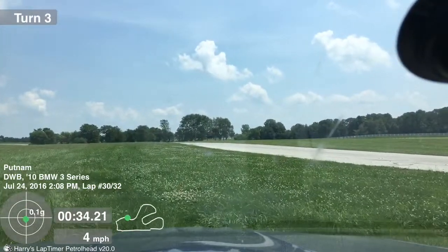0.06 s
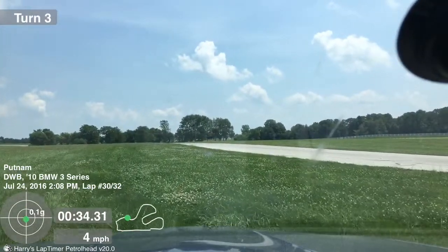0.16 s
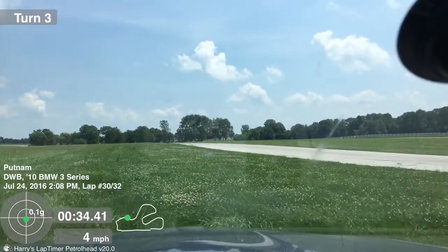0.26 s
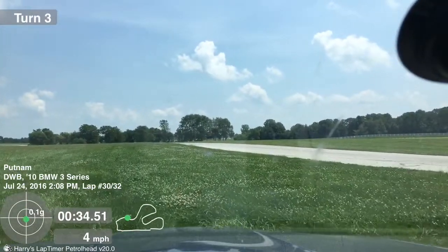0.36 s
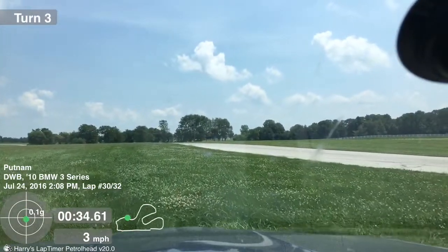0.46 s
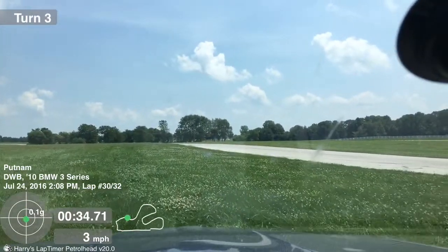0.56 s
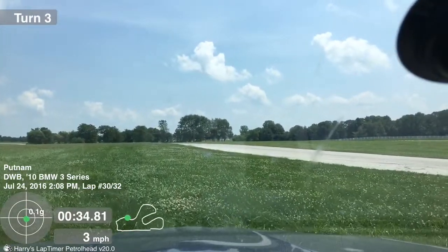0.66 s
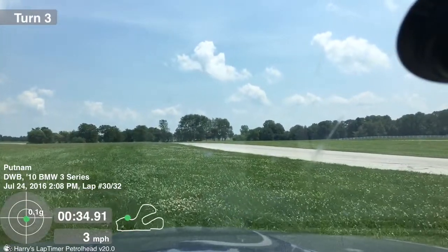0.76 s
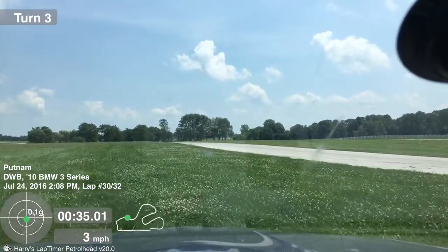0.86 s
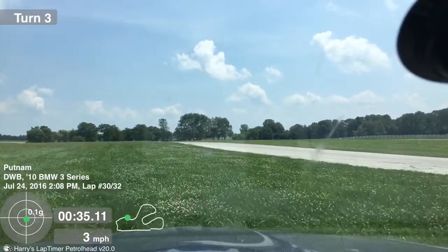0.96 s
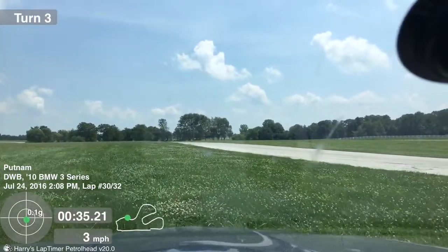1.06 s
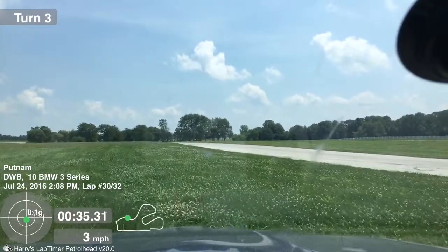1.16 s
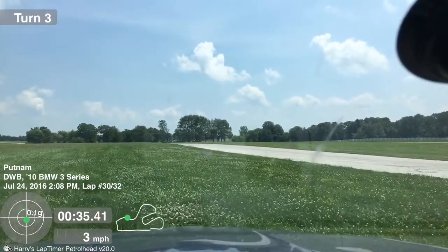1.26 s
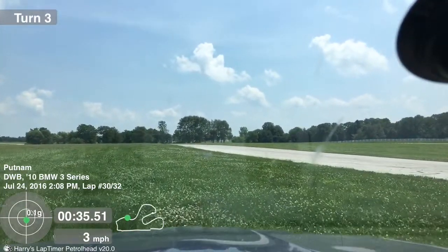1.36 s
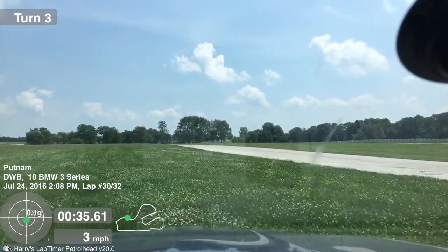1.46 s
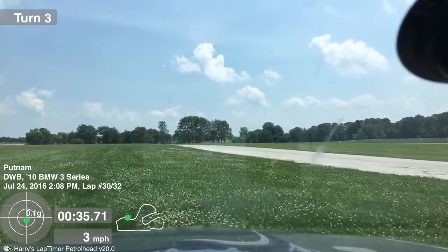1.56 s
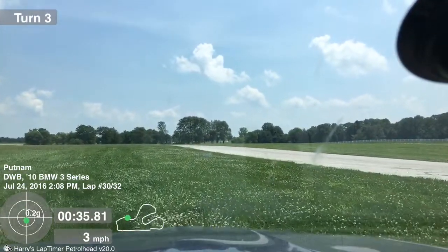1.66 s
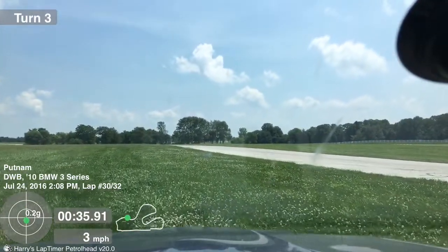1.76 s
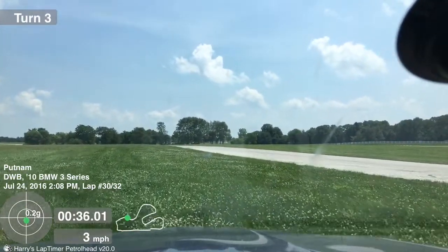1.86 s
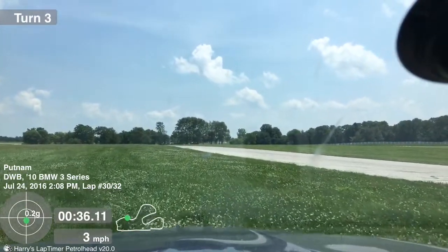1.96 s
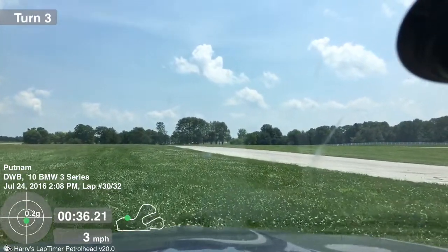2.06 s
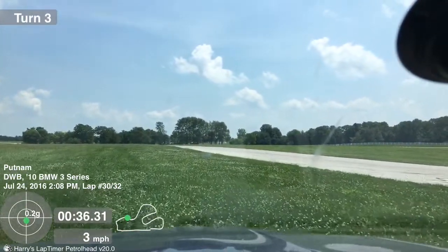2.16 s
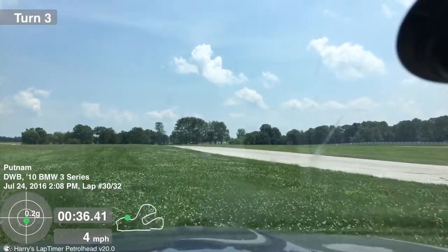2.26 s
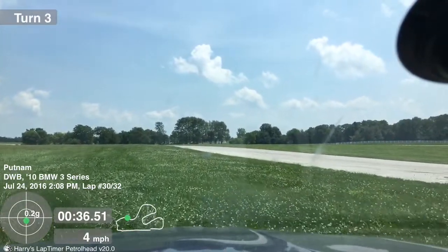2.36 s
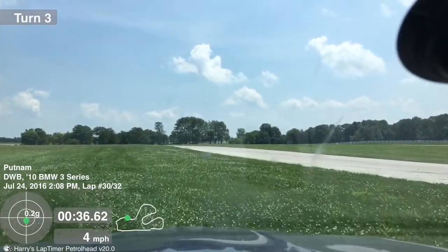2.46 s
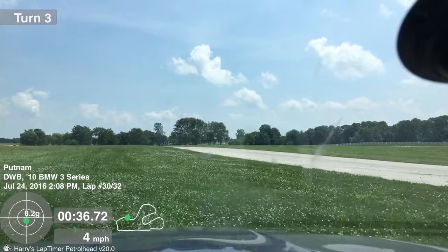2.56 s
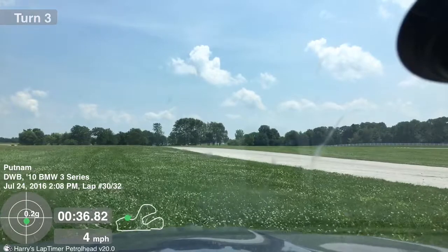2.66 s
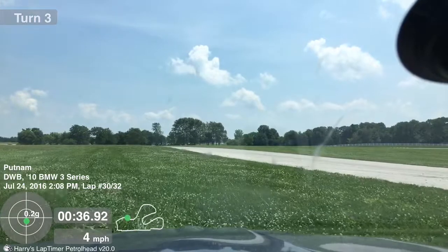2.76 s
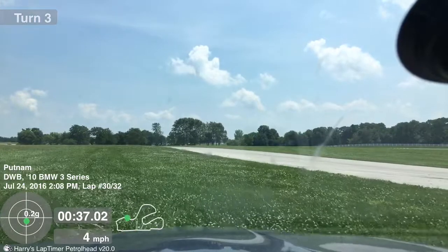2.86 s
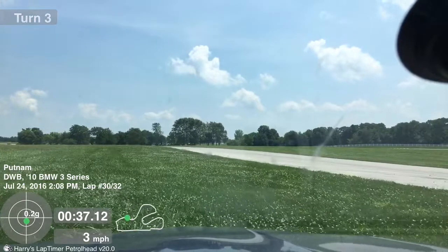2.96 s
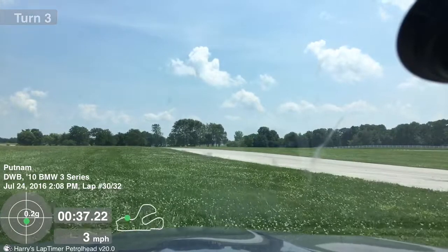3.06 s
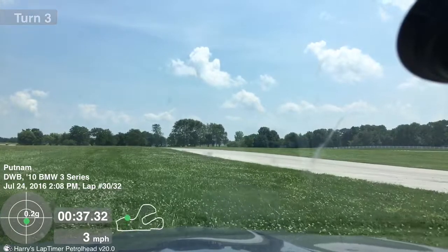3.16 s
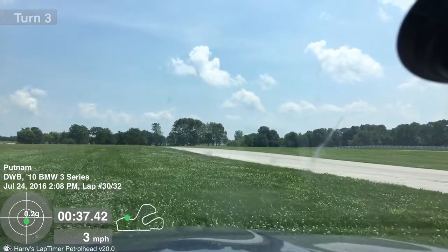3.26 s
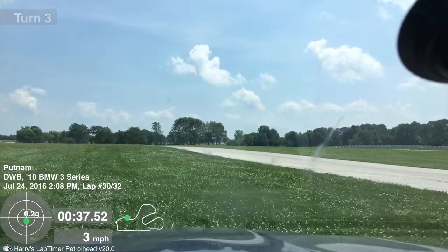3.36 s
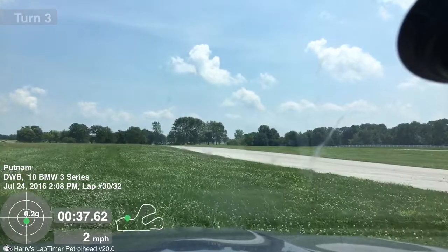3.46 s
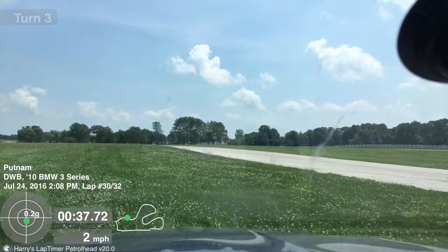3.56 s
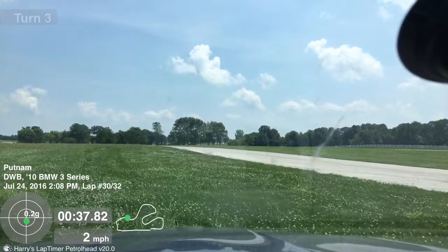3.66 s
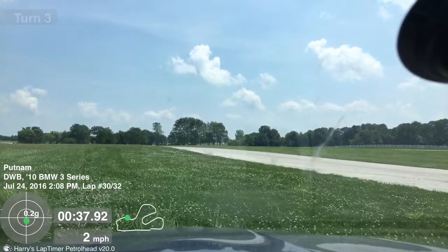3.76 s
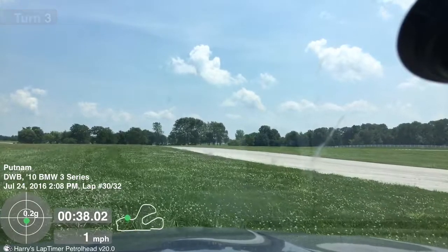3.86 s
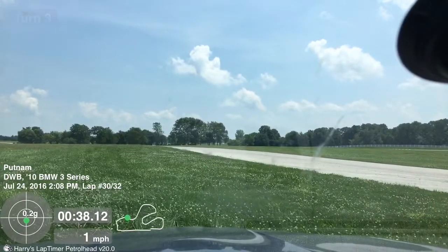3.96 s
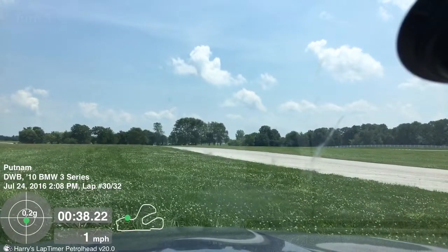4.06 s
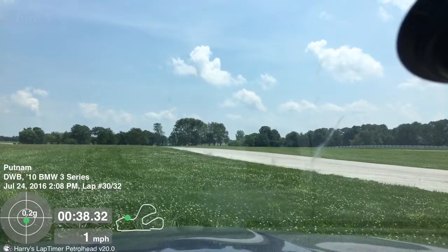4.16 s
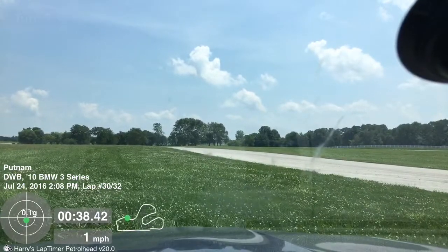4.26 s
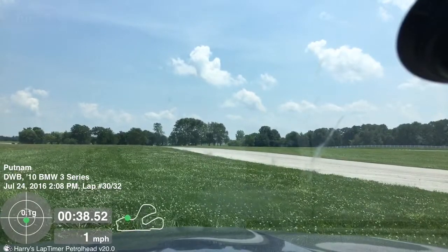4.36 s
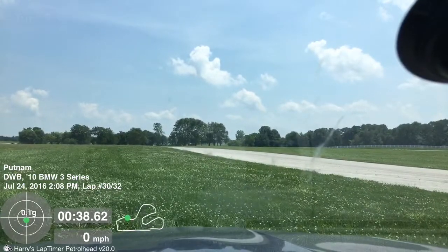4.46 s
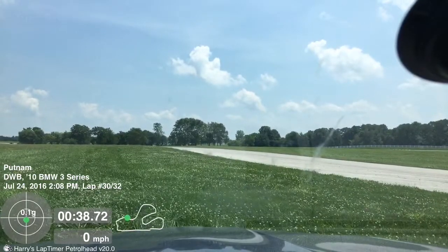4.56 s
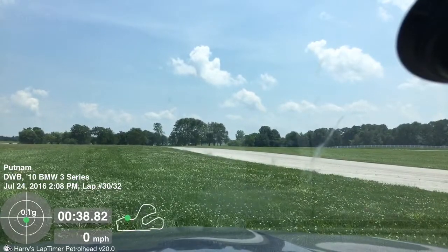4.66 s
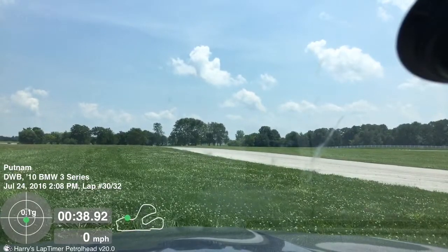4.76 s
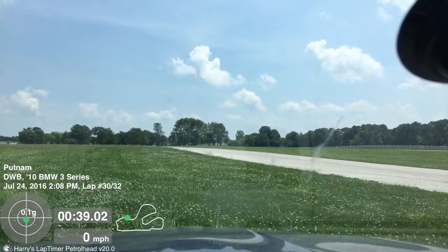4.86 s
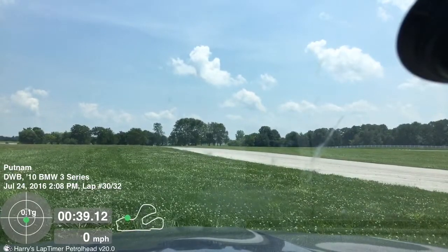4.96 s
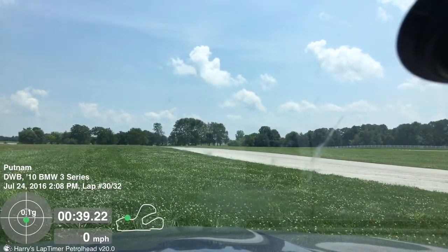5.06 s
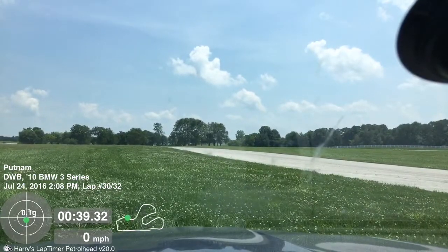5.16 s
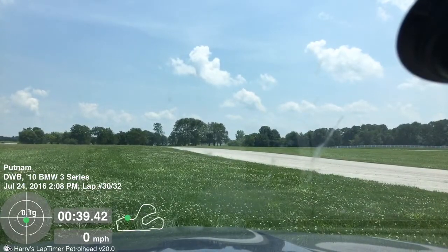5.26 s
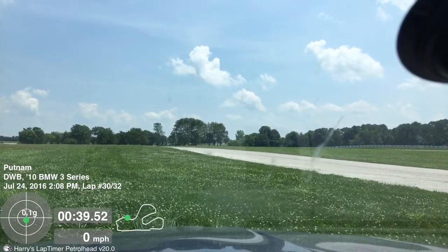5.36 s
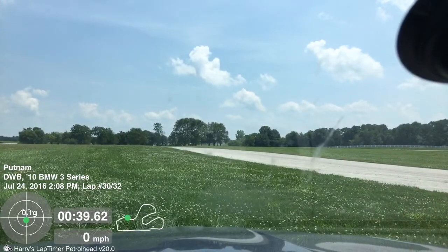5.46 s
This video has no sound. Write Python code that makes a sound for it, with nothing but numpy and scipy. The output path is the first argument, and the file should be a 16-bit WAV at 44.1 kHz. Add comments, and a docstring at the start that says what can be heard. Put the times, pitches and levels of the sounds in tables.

```python
"""A low rumble of tyres on grass and the ventilation's roar come first, inside a creeping six-cylinder car.
The engine, a sum of tones tied to its firing, lifts from idle, booms under load, sags and settles to idle.
The body thumps on bumps, as short swells of low tone; the drive whirrs, as noise with whining partials.
Hands and sleeves rustle and click at the controls, as shaped noise bursts; a plastic catch snaps.
The gear lever knocks once and rebounds, as decaying modes driven by contact pulses."""
import sys
import numpy as np
from scipy import signal
from scipy.fft import rfft, irfft
from scipy.io import wavfile

SR = 44100
rng = np.random.default_rng(int(sys.argv[2]) if len(sys.argv) > 2 else 0)


def log_audio(samples):
    """Write samples as a 16-bit WAV file to the path given in sys.argv[1]."""
    # one column per channel
    frames = np.atleast_2d(samples).T
    # limit to full scale, then quantise
    limited = np.clip(frames, -1, 1)
    pcm = np.round(limited * 32767).astype(np.int16)
    wavfile.write(sys.argv[1], SR, pcm)


N = 242991
T = np.arange(N) / SR  # time in seconds

# Bumps through the suspension.
# Each row: peak time in seconds, level in dB, frequency in Hz, half length in seconds.
BUMPS = [(.075, -27, 150, 0.007), (.2, -32.5, 78.6, 0.07), (0.379, -21, 77.6, 0.042),
         (0.519, -18.5, 91, 0.01), (1.041, -21, 74.6, 0.015), (1.124, -16.5, 144.5, 0.0097),
         (3.085, -23, 136, 0.013), (3.299, -18.5, 76.5, 0.0078), (3.9, -28, 105, 0.014),
         (4.98, -28.5, 173.8, 0.01315)]


def amp(db):
    """Level and amplitude: 20 dB is a factor of ten."""
    return 10 ** (np.asarray(db) / 20)


def unit(x):
    """Normalization by the root mean square, to rms 1."""
    return x / np.sqrt(np.mean(x ** 2) + 1e-20)


def curves(rows):
    """Linear interpolation in time of each column after the first."""
    s, *columns = np.transpose(rows)
    return [np.interp(T, s, column) for column in columns]


def colour(x, points):
    """Zero-phase filtering: the spectrum is multiplied by a gain joined in dB over log frequency."""
    hz, db = np.transpose(points)
    f = np.fft.rfftfreq(len(x), 1 / SR)
    gain = amp(np.interp(np.log(f + 1), np.log(hz), db))
    return irfft(rfft(x) * gain, len(x))


def noise(points):
    """Broadband noise: white noise filtered to a given spectrum, at rms 1."""
    return unit(colour(rng.standard_normal(N), points))


def drift(rate_hz):
    """Slow random fluctuation: white noise low-passed around rate_hz, at rms 1."""
    f = np.fft.rfftfreq(N, 1 / SR)
    return unit(irfft(rfft(rng.standard_normal(N)) / (1 + (f / rate_hz) ** 4), N))


def swell(s, half_s):
    """Gaussian envelope around time s, down to 1/e at half_s to either side."""
    return np.exp(-((T - s) / half_s) ** 2)


def add(mix, s, sound):
    """Superposition: adds a sound into the mix from time s."""
    part = mix[max(round(s * SR), 0):][:len(sound)]
    part += sound[:len(part)]


def ring(modes):
    """Free decay as a sum of damped modes; alternate signs set neighbours swinging against each other."""
    t = T[:SR // 4]
    out = np.zeros(len(t))
    for k, (hz, db, t60) in enumerate(modes):
        out += (-1) ** k * amp(db - 60 * t / t60) * np.sin(2 * np.pi * hz * t)
    return out


def cabin_echo(x, wet_db, t60):
    """Reverberation: dense, decaying reflections from glass and trim, by convolution."""
    t = T[:SR // 6]
    taps = rng.standard_normal(len(t)) * amp(-60 * t / t60) * (t > .002)
    return x + amp(wet_db) * signal.fftconvolve(x, taps / np.linalg.norm(taps))[:N]


def tyre_rumble():
    """Structure-borne noise: tyres rumble through the floor, fading slowly and shaken up at each bump."""
    # Each row: frequency in Hz, relative level in dB.
    rumble_colour = [(15, -22), (25, -18), (36, 4), (60, 1), (75, 7), (90, 1.5), (145, 2), (175, -18.5),
                     (215, -14), (400, -45), (900, -96)]
    roll_db, fade_db_per_s = -36, 0.5
    shake_db, shake_s = -18, .1  # level against the bump, half length
    shake = sum(amp(db + shake_db) * swell(s, shake_s) for s, db, _, _ in BUMPS)
    rolling = amp(roll_db - fade_db_per_s * T)
    return np.hypot(rolling, shake) * noise(rumble_colour)


def blower():
    """Flow noise and tonal hum: the blower roars broadly, and its steady tones waver with the air flow."""
    # Each row: frequency in Hz, relative level in dB.
    roar_colour = [(60, -18.5), (170, 6), (260, -1), (340, -2), (410, -5.5), (480, -7.5), (660, -10.5),
                   (820, -21.5), (1100, -17.5), (2000, -34), (5000, -45)]
    # Hum of the blower. Each row: frequency in Hz, mean peak level in dB.
    hum_tones = [(401, -55.5), (251.5, -56.5), (772, -75.5)]
    roar_db = -45.5
    out = amp(roar_db + 1.53 * drift(14)) * noise(roar_colour)
    for hz, db in hum_tones:
        phase = 2 * np.pi * hz * T + 1.2 * drift(6)
        out += amp(db + 2.5 * drift(4)) * np.cos(phase)
    return out


def whirr(turns, throb=0.059, trim_db=0.5, whine_rise=1.7):
    """Amplitude modulation: valve gear hisses in step with the firing, over the whine of belt-driven parts."""
    # Each row: frequency in Hz, relative level in dB.
    hiss_colour = [(300, -36.5), (800, -2), (1050, -5), (1270, 3), (1420, -0.5), (1620, -1), (2000, -8),
                   (2500, -13), (3100, -17), (4100, -14), (4900, -21), (6400, -21), (8000, -32),
                   (15000, -44)]
    # Level of belt and valve gear. Each row: time in seconds, level in dB before the trim.
    whirr_levels = [(0, -57.5), (2.8, -60), (3.3, -57), (4.4, -59), (5.2, -53.5), (5.51, -55.5)]
    # Each row: multiple of the firing rate, level in dB against the whirr where that is loudest.
    whine_partials = [(24, -21), (36, -16.5), (40, -12.5), (44, -16.5), (46, -14), (48, -17.5)]
    level_db, = curves(whirr_levels)
    hiss = noise(hiss_colour) * (1 + throb * np.cos(2 * np.pi * turns))
    hiss = hiss * amp(.8 * drift(16))
    whine = np.zeros(N)
    for multiple, db in whine_partials:
        # each partial swells and wavers by itself
        phase = 2 * np.pi * multiple * turns + drift(9)
        whine += amp(db + 3 * drift(4)) * np.cos(phase)
    # the whine grows faster than the hiss as the level rises
    whine_gain = amp(whine_rise * (level_db - level_db.max()))
    return amp(level_db + trim_db) * (hiss + whine * whine_gain)


def drone():
    """A linear frequency glide: a low tone swells, rises a little and fades as the engine recovers."""
    # Values: peak time in seconds, level in dB, frequency at the peak in Hz,
    # half length in seconds, glide in Hz per second.
    s, db, hz, half_s, glide = (4.04, -46.5, 268, .16, 35)
    t = T - s
    return amp(db) * swell(s, half_s) * np.cos(2 * np.pi * (hz + glide * t / 2) * t)


def rustle(rest_db=-76, crackle_db=-1, trim_db=0.5):
    """Stick-slip friction: cloth and skin slide in clumps of tiny slips; now and then a crease snaps."""
    # Strokes of sleeves and hands.
    # Each row: peak time in seconds, level in dB before the trim, half length in seconds.
    hand_strokes = [(0.29, -61, 0.05), (0.553, -47, 0.037), (0.584, -45, 0.0071), (0.683, -57.5, 0.019),
                    (1.288, -59.5, .035), (1.382, -57, 0.028), (2.26, -55.5, 0.032), (2.337, -61.5, 0.2),
                    (2.783, -66.5, 0.062), (2.99, -62.5, 0.078), (3.109, -55.5, 0.031), (3.31, -67, .11),
                    (3.592, -60.5, 0.031), (5.1, -60.5, 0.091), (5.27, -62, 0.097)]
    # Each row: frequency in Hz, relative level in dB.
    friction_colour = [(500, -33), (1500, 6), (2800, 1), (4000, 5.5), (7000, 1.5), (9000, 0.5),
                       (11000, -5.5), (13000, -3), (15500, -10.5)]
    power = amp(rest_db) ** 2
    for s, db, half_s in hand_strokes:
        power = power + (amp(db + trim_db) * swell(s, half_s)) ** 2
    slips = rng.standard_normal(N) * amp(2.5 * drift(900) + 2.2 * drift(60))
    # about 60 creases per second, each a burst of noise decaying in 1.8 ms
    creases = rng.uniform(.3, 1, N) * (rng.random(N) < 60 / SR)
    creases = signal.oaconvolve(creases, np.exp(-T[:512] / .0018))[:N]
    creases = creases * rng.standard_normal(N)
    friction = unit(slips) + amp(crackle_db) * unit(creases)
    return np.sqrt(power) * unit(colour(friction, friction_colour))


def clicks(fall_s=0.0014, focus_db=7.5, trim_db=-4.5):
    """Impact noise: each tap is a short burst, favoured around the pitch of the part that is tapped."""
    # Taps at the controls.
    # Each row: time in seconds, level in dB before the trim, pitch of the tapped part in Hz.
    control_taps = [(0.159, -45, 4060), (0.297, -40, 6750), (0.3282, -39.5, 4270), (0.4957, -42, 4000),
                    (0.54, -38, 7180), (0.5727, -23.5, 3830), (0.6735, -33, 3970), (1.1324, -39, 4250),
                    (1.3743, -34.5, 4946), (1.3844, -39.5, 3630), (1.7526, -45, 3457), (1.8353, -49, 3030),
                    (2.172, -44, 3660), (2.2132, -33, 3796), (2.2397, -38, 4146), (2.2533, -37, 5280),
                    (2.2886, -34.5, 3600), (2.5298, -45, 3278), (2.5715, -46, 4430), (2.9711, -29.5, 5325),
                    (3.0219, -44, 5300), (3.0939, -39.5, 7200), (3.2001, -43, 3877), (3.274, -45.5, 4420),
                    (3.4006, -39, 3100), (3.5576, -37, 9660), (4.2106, -40, 3360), (5.227, -40.5, 5740),
                    (5.3153, -43, 5783), (5.3863, -40, 5267)]
    # Each row: frequency in Hz, relative level in dB.
    tap_colour = [(300, -30), (1000, -1), (2400, -2.5), (3700, -5.5), (5200, -3), (7200, -1), (9500, -6),
                  (13000, -8), (16000, -16)]
    out = np.zeros(N)
    t = T[:2048] - .002
    tap = np.exp(-abs(t) / fall_s) * (1 - np.exp(-np.maximum(t, 0) / .0003))
    # the dashboard scatters a short tail after the tap
    scatter = amp(-12 - 60 * t / .07) * (t > 0)
    for s, db, hz in control_taps:
        burst = rng.standard_normal(len(t)) * (tap + scatter)
        burst = colour(burst, tap_colour)
        burst = colour(burst, [(hz / 2, -focus_db), (hz, 0), (hz * 2, -focus_db)])
        # equal energy for every burst before its level
        burst = burst * np.sqrt(SR * fall_s) / np.linalg.norm(burst)
        add(out, s + t[0], amp(db + trim_db) * burst)
    return out


def snaps(trim_db=-10):
    """Modal decay: a plastic catch rings briefly and the cabin reflects it."""
    # Each row: time in seconds, level in dB before the trim.
    catch_snaps = [(0.55, -35.5), (0.572, -38.5), (4.213, -34)]
    # Each row: mode frequency in Hz, relative level in dB, 60 dB decay time in seconds.
    catch_modes = [(1150, 2, 0.023), (1397, 1, 0.034), (1623, -1, 0.066), (1806, -1.5, 0.034),
                   (2150, -5, .015), (2590, -7, 0.028), (3250, 4, 0.0063)]
    out = np.zeros(N)
    for s, db in catch_snaps:
        add(out, s, amp(db + trim_db) * ring(catch_modes))
    return cabin_echo(out, wet_db=-2.0, t60=0.033)


def knocks():
    """Contact time as a low-pass: the lever hits its stop and rebounds; long contacts ring only low modes."""
    # Blows of the gear lever.
    # Each row: time in seconds, level in dB, contact time in milliseconds.
    lever_blows = [(3.0708, -27.5, .38), (3.093, -43, 2.0), (3.1045, -30.5, .85), (3.127, -39, 1.2),
                   (3.1708, -32, .8)]
    # Modes of lever and console.
    # Each row: frequency in Hz, relative level in dB, 60 dB decay time in seconds.
    lever_modes = [(271, 1, 0.078), (297, 0, 0.082), (367, -1, 0.044), (450, -1.5, 0.036), (680, -5, 0.052),
                   (739, -4, 0.049), (1180, -3, 0.025), (1260, -5, 0.026), (1480, -10.5, 0.037),
                   (1760, -19, .035), (1840, -20, .03), (2380, -15.5, 0.027), (3230, -18, 0.022)]
    out = np.zeros(N)
    ms = 1000 * T[:256]
    for s, db, contact_ms in lever_blows:
        push = np.sin(np.pi * np.minimum(ms / contact_ms, 1)) ** 2
        add(out, s, amp(db) * np.convolve(ring(lever_modes), push / push.sum()))
    return cabin_echo(out, wet_db=-12, t60=.1)


def thumps():
    """Cavity resonance: bumps swell and die in the cabin's low air modes."""
    out = np.zeros(N)
    for s, db, hz, half_s in BUMPS:
        out += amp(db) * swell(s, half_s) * np.cos(2 * np.pi * hz * (T - s))
    return out


def engine(turns, firing_hz, boom_db, waver_db=1.0, lope_db=-2.0):
    """Harmonic series: exhaust boom and overtones follow the load, with a lope from unequal cylinders."""
    # Each row: multiple of the firing rate, level in dB at medium load before the cabin,
    # share of the boom's swing in dB that the overtone follows.
    boom_overtones = [(2, -32, 0.24), (3, -36.5, 0.22), (4, -40, 0.18), (5, -41, 0.12)]
    # Lines between the firing multiples, from unequal cylinders.
    # Each row: multiple of the firing rate, level in dB before lope_db, fade and cabin.
    lope_lines = [(9 / 6, -41), (11 / 6, -39), (13 / 6, -41.5), (15 / 6, -43), (21 / 6, -48)]
    # The cabin favours some tones and shuts out higher ones. Each row: frequency in Hz, gain in dB.
    cabin_response = [(68, -2.5), (82, -0.5), (100, -5), (128, 0.5), (150, 1), (165, -2), (190, -15.5),
                      (260, -27)]
    medium_boom_db, idle_hz = -30.5, 40
    sag_db_per_hz, lope_fade_db_per_hz = 1, .9

    def cabin_db(multiple):
        """Room resonance: the cabin's gain at a multiple of the firing rate."""
        return np.interp(multiple * firing_hz, *np.transpose(cabin_response))

    load_db = boom_db - medium_boom_db
    # overtones and lope weaken as the engine sags below idle
    sag_db = sag_db_per_hz * np.minimum(firing_hz - idle_hz, 0)
    # the lope smooths out as the engine speeds up from idle
    uneven_db = lope_db - lope_fade_db_per_hz * np.maximum(firing_hz - idle_hz, 0)
    out = amp(boom_db + 0.58 * drift(14)) * np.cos(2 * np.pi * turns)
    for k, db, share in boom_overtones:
        level_db = db + share * load_db + sag_db + cabin_db(k) + waver_db * drift(7.7)
        out += amp(level_db) * np.cos(2 * np.pi * (round(k) * turns + rng.random()))
    for multiple, db in lope_lines:
        level_db = db + uneven_db + sag_db + cabin_db(multiple) + 3.0 * drift(3.1)
        out += amp(level_db) * np.cos(2 * np.pi * (multiple * turns + rng.random()))
    return np.sqrt(2) * out  # from rms to peak


def scene():
    """Superposition of all sources, with engine and whirr locked to one firing phase."""
    # Engine speed and load.
    # Each row: time in seconds, firing rate in Hz, exhaust boom at the firing rate in dB (rms).
    engine_course = [(0.0, 39.78, -55), (0.31, 39.96, -35.5), (0.49, 42.69, -36), (0.74, 50.13, -23.5),
                     (0.89, 54.2, -33), (1.07, 64.27, -32.5), (1.17, 67.67, -29.5), (1.3, 64.5, -28.5),
                     (1.47, 56.1, -27.5), (1.6, 52.7, -26.5), (1.9, 51.15, -22), (1.99, 48.97, -19.5),
                     (2.42, 54.64, -25), (2.53, 53.28, -30.5), (2.73, 47.22, -24), (2.93, 50.04, -25.5),
                     (3.02, 49.76, -18.5), (3.19, 48.92, -35), (3.3, 45.91, -29), (3.57, 39.12, -46),
                     (3.7, 35.02, -50), (3.97, 39.01, -44.5), (4.54, 40.67, -36.5), (5.51, 40.88, -36)]
    firing_hz, boom_db = curves(engine_course)
    turns = np.cumsum(firing_hz) / SR  # firing cycles so far
    background = tyre_rumble() + blower() + whirr(turns) + drone()
    handling = rustle() + clicks() + snaps() + knocks()
    return (background + handling + thumps() + engine(turns, firing_hz, boom_db))[None]


def record(dry):
    """Band limitation: a linear-phase low-pass filter removes the highest treble."""
    edge_hz = 15400
    lowpass = signal.firwin(511, edge_hz, window=("kaiser", 9), fs=SR)
    return signal.oaconvolve(dry, lowpass[None], "same")


dry = scene()
out = record(dry)
log_audio(out)
```